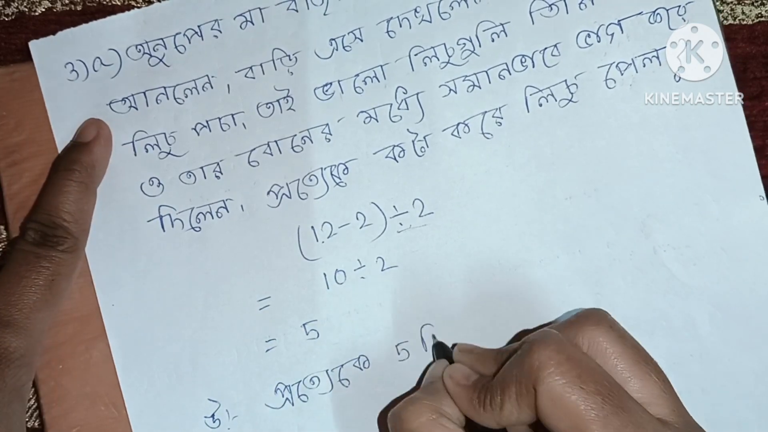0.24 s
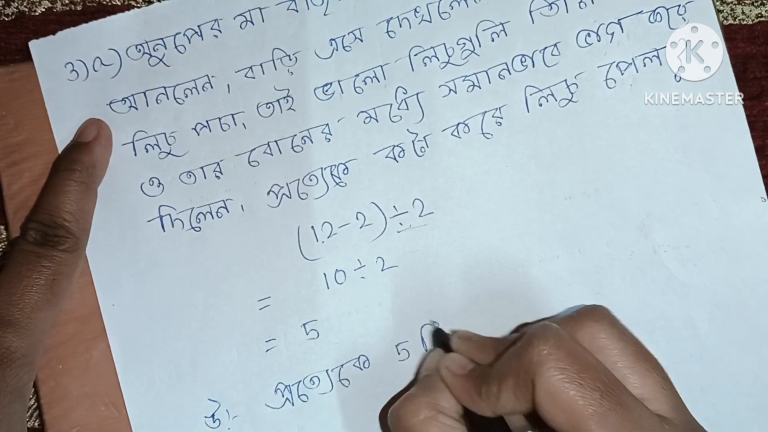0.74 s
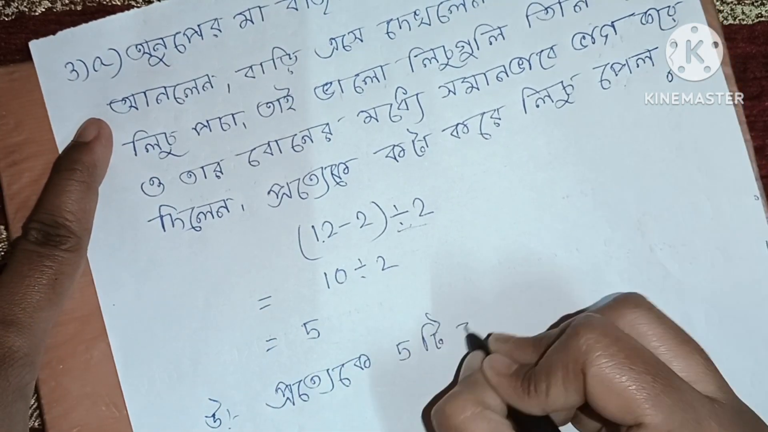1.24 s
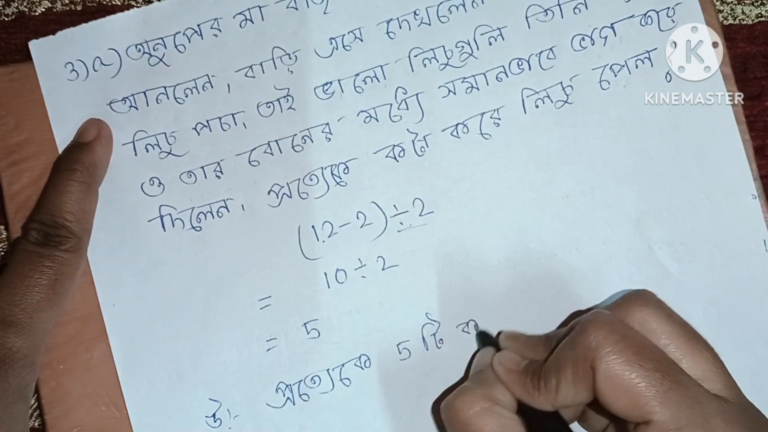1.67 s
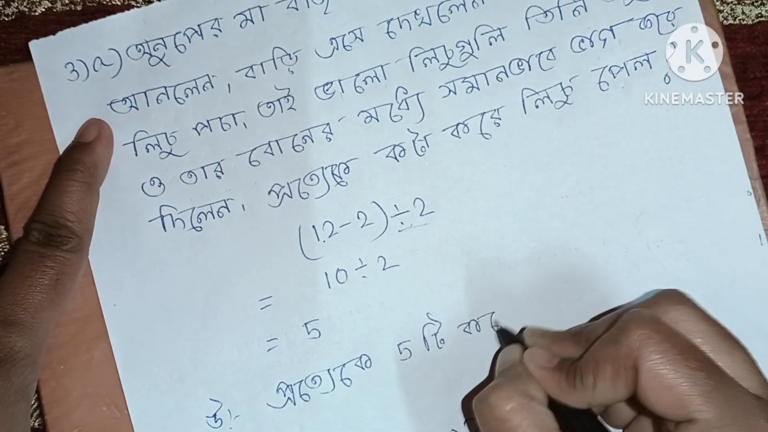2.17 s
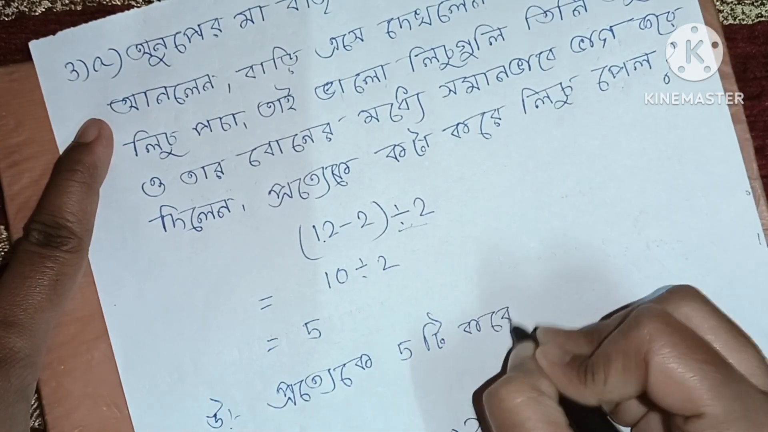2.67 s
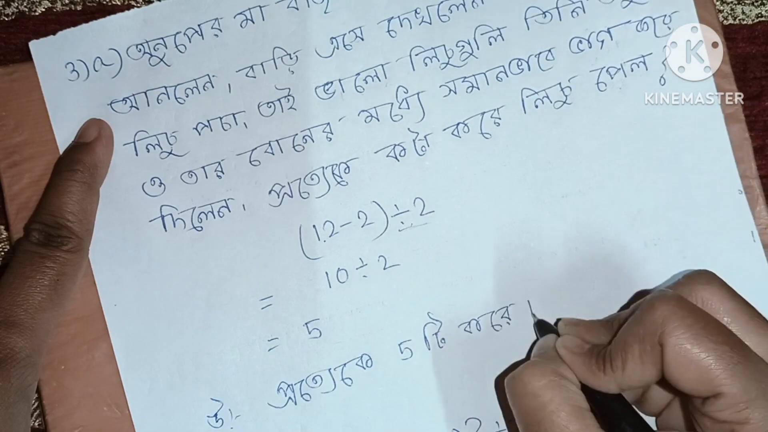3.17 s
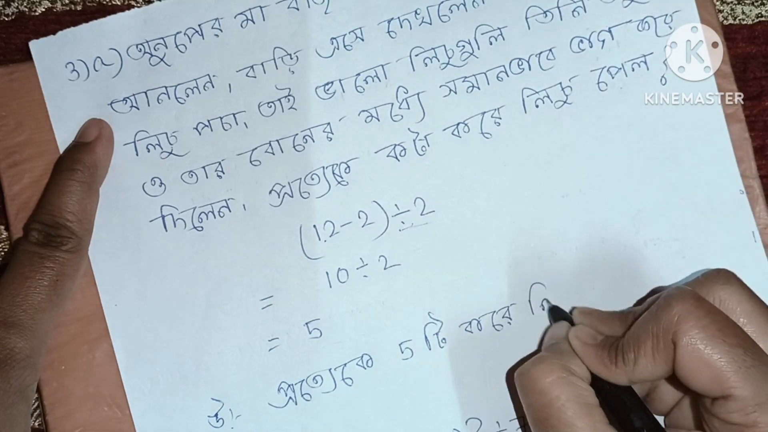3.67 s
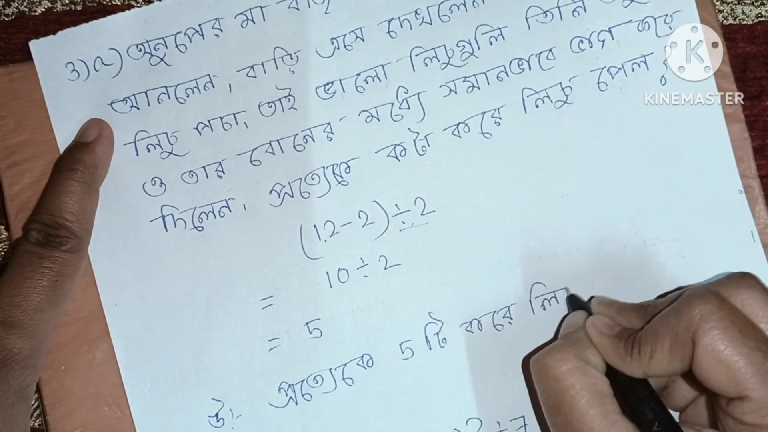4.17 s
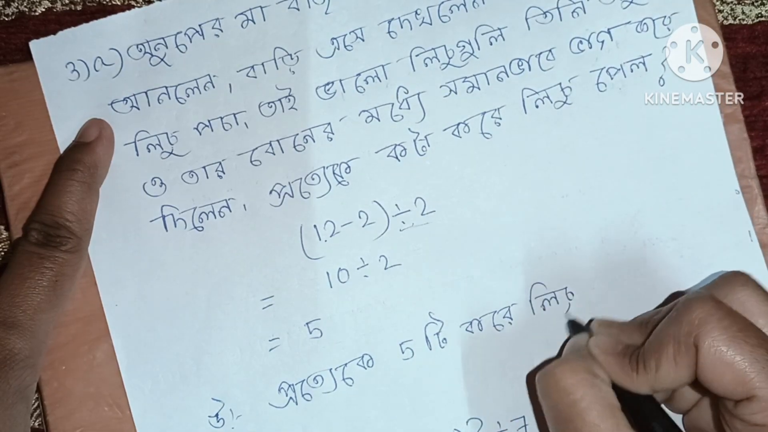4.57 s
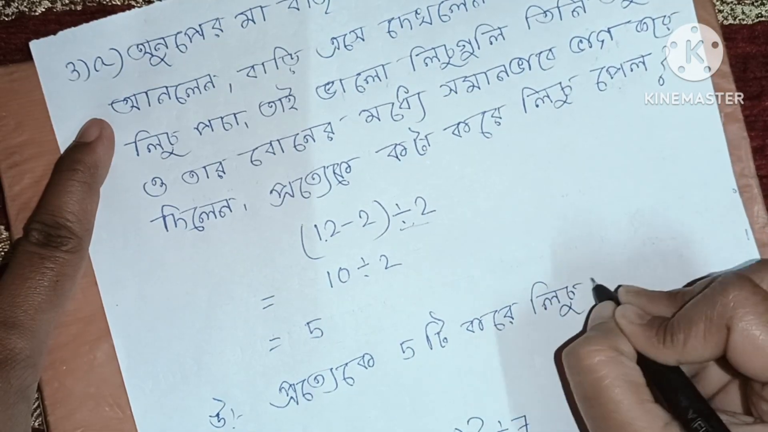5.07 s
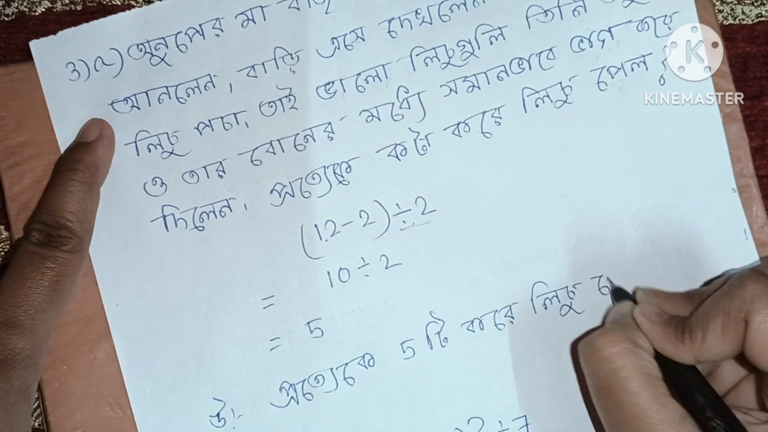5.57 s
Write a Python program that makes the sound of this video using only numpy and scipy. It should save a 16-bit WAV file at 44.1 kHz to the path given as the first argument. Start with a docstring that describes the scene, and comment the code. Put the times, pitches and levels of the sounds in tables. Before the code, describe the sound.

Close to a small microphone in a quiet room, a ballpoint writes on a sheet lying on a wooden table. Faint scratchy strokes and paper rustle come in uneven bursts over a low steady hush. The table knocks dully as tip or hand lands. The plastic pen snaps at just over one second and loudest at two, then lighter strokes, ticks and taps continue almost to the end.

```python
"""Someone writes with a ballpoint on a sheet on a wooden table in a quiet room, close to a small microphone.
Over a steady hush, short strokes scratch (ball on fibres) and rustle (sheet under the hand) from the start.
The table rumbles along and knocks when tip or hand lands; the plastic pen ticks, and snaps at about 1.2 to 1.3 s.
A faint sagging tone runs from 1.45 to 2.03 s, then come the loudest snaps; strokes, ticks and knocks go on
almost to the end. Ticks and knocks are struck modes, and the room answers them with a short echo tail."""
import sys
import numpy as np
from scipy import signal
from scipy.fft import rfft, irfft
from scipy.io import wavfile

SR = 44100
rng = np.random.default_rng(int(sys.argv[2]) if len(sys.argv) > 2 else 0)


def master(y):
    """Save y as 16-bit WAV."""
    cut = np.clip(np.atleast_2d(y).T, -1, 1)
    pcm = np.round(cut * 32767)  # scale
    wavfile.write(sys.argv[1], SR, pcm.astype(np.int16))


N = 257103   # length in samples

# Pen strokes: middle_s, length_s (between half-power points), scratch_db, rustle_db
PEN_STROKES = [(0.0, 0.062, -65, -61), (0.07, 0.023, -65, -62), (0.16, 0.046, -72, -64),
               (0.264, 0.074, -70.5, -70), (0.433, 0.028, -68.5, -63.5), (0.919, 0.055, -76, -68.5),
               (1.065, 0.034, -65, -63.5), (1.211, 0.075, -46.5, -50.5), (1.325, 0.029, -57, -69),
               (1.415, 0.043, -62, -61.5), (1.498, 0.032, -72, -65), (1.612, 0.025, -67.5, -65),
               (1.716, 0.037, -65.5, -63), (1.899, 0.061, -65.5, -67.5), (2.015, 0.056, -57, -68),
               (2.102, 0.031, -56, -60.5), (2.19, 0.017, -56, -55), (2.265, 0.032, -66, -54),
               (2.445, 0.034, -56, -53.5), (2.512, 0.07, -67, -59), (2.629, 0.031, -80.5, -74.5),
               (3.037, 0.052, -75, -71), (3.126, 0.03, -63, -65), (3.192, 0.069, -51, -49.5),
               (3.309, 0.04, -57, -55), (3.424, 0.037, -56, -56), (3.49, 0.044, -58.5, -53.5),
               (3.558, 0.032, -63, -56), (3.66, 0.018, -82, -67), (3.742, 0.052, -86, -66.5),
               (4.028, 0.026, -72.5, -68.5), (4.17, 0.039, -71.5, -71.5), (4.313, 0.042, -54, -56),
               (4.434, 0.047, -63.5, -57.5), (4.582, 0.018, -65.5, -59), (4.735, 0.043, -73.5, -70),
               (4.942, 0.063, -68, -80), (5.019, 0.031, -59, -63), (5.09, 0.11, -68, -64),
               (5.168, 0.051, -55.5, -59), (5.298, 0.017, -64, -67), (5.393, 0.023, -60.5, -52.5),
               (5.618, 0.079, -71.5, -76.5), (5.747, 0.024, -75, -62.5)]
# Weight of the hand dragging on the sheet, given as the rustle it makes: time_s, rustle_db
HAND_WEIGHT = [(0.0, -69.5), (0.37, -73.5), (0.97, -75), (1.14, -66), (1.2, -65), (1.33, -54),
               (1.51, -65.5), (1.8, -70), (2.0, -63), (2.06, -45), (2.16, -53.5), (2.4, -59.5), (2.63, -69),
               (2.9, -74.5), (3.12, -70), (3.18, -54.5), (3.4, -60), (3.85, -69), (4.2, -78.5),
               (4.27, -62.5), (4.77, -66), (4.92, -65), (5.39, -62.5), (5.83, -74.5)]
# Ringing modes of the table top: pitch_hz, relative level_db, t60_s (time to fade by 60 dB)
TABLE_MODES = [(112, -17.5, 0.022), (174, -1.5, 0.015), (256.4, -3.5, 0.033), (314.3, -10.5, 0.035),
               (439.2, -10, 0.029), (550.4, -0.5, 0.02), (664, 2, 0.014), (772.4, -15, 0.032)]
UPPER_FROM_HZ = 400   # the table's upper modes begin here


def amp(db):
    """Decibels to gain."""
    return 10 ** (np.asarray(db) / 20)


def rms_one(x):
    """Scale to unit rms, an average strength of 1."""
    return x / np.sqrt(np.mean(x ** 2) + 1e-20)


def in_time(rows):
    """Turn a table of points in time into curves with one value a sample."""
    time_s, *columns = np.transpose(rows)
    return [np.interp(np.arange(N) / SR, time_s, column) for column in columns]


def drift(rate_hz):
    """Slow random wandering with unit spread, moving about rate_hz times a second."""
    step = 40   # samples between the computed points
    r = np.exp(-2 * np.pi * rate_hz * step / SR)
    noise = rng.standard_normal(N // step + 2002)
    slow = signal.lfilter([1], [1, -2 * r, r * r], noise)[2000:]   # skip the settling of the filter
    return np.interp(np.arange(N) / step, np.arange(len(slow)), rms_one(slow))


def ring(clicks, hz, t60_s):
    """A resonance: a unit click sets off a fading sine that starts at height 1."""
    r = amp(-60 / (t60_s * SR))
    w = 2 * np.pi * hz / SR
    return signal.lfilter([0, np.sin(w)], [1, -2 * r * np.cos(w), r * r], clicks + 1e-18)


def coloured(x, spectrum):
    """Give a white signal the shape of a spectrum, at unit rms."""
    hz, level_db = np.transpose(spectrum)
    grid_hz = np.maximum(np.fft.rfftfreq(N, 1 / SR), 1)
    shape_db = np.interp(np.log(grid_hz), np.log(hz), level_db)
    edge_db = -30 * np.maximum(np.log2(hz[0] / grid_hz), 0)   # falls away under the first point
    return rms_one(irfft(rfft(x) * amp(shape_db + edge_db), N))


def grains(per_s, spread_db):
    """Random tiny clicks with uneven sizes and signs, like fibres giving way."""
    sizes = amp(spread_db * np.minimum(rng.exponential(1, N), 5))
    signs = rng.choice([-1, 1], N)
    return sizes * signs * (rng.random(N) < per_s / SR)


def struck(times_s, modes, group_db, build_cycles):
    """Every blow strikes each mode with its group's strength, give or take; a mode builds up over some cycles."""
    at = np.round(times_s * SR).astype(int)
    luck = rng.standard_normal((len(times_s), len(modes)))
    total = 0
    for k, (hz, level_db, t60_s) in enumerate(modes):
        clicks = np.zeros(N)
        clicks[at] = amp(group_db(hz) + level_db + 2 * luck[:, k])
        push_s = build_cycles / hz
        push = ring(clicks, hz, push_s)   # a short ringing drives the mode proper
        even_out = 3 * np.log(1000) / (push_s * SR)   # offsets the gain of ringing twice
        total = total + ring(push, hz, t60_s) * even_out
    return total


def soft(x, hz):
    """Dull a sound like a contact that lasts a while: double one-pole low-pass."""
    r = np.exp(-2 * np.pi * hz / SR)
    return signal.lfilter([(1 - r) ** 2], [1, -2 * r, r * r], x)


def above(x, hz):
    """High-pass: a small top radiates little below its lowest mode."""
    return signal.sosfilt(signal.butter(2, hz, "high", fs=SR, output="sos"), x)


def with_swells(steady_db, swells):
    """Gains of two layers: slow levels plus short swells, added in power, that set in and stop fairly abruptly."""
    t = np.arange(N) / SR
    powers = amp(2 * np.array(steady_db))   # doubled decibels turn gain into power
    for middle_s, length_s, *levels_db in swells:
        first = max(int((middle_s - 2 * length_s) * SR), 0)
        near = slice(first, int((middle_s + 2 * length_s) * SR))
        place = 2 * (t[near] - middle_s) / length_s   # -1 and 1 are the half-power points
        edge = np.where(place < 0, 3.5, 2.5)   # the rise is steeper than the fall
        shape = 2 ** -np.abs(place) ** edge
        powers[:, near] += np.outer(amp(2 * np.array(levels_db)), shape)
    return np.sqrt(powers)


def with_hand(usual_db, share):
    """A level in dB that follows a share of the swing in the weight of the hand."""
    usual_weight_db = -65
    return usual_db + share * (in_time(HAND_WEIGHT)[0] - usual_weight_db)


def quiet_hush():
    """Steady noise with a fixed spectrum, its level wandering slowly."""
    # Colour of the background noise: pitch_hz, relative level_db per Hz
    hush_spectrum = [(18, -71), (30, -14.5), (43, 5.5), (173, 6.5), (399, -15), (518, -6), (1020, -11),
                     (2760, -17), (6050, -39), (8060, -43), (9680, -38), (11300, -42), (15500, -43.5)]
    level_db = -63.5 + 2.4 * drift(1.4)
    return amp(level_db) * coloured(rng.standard_normal(N), hush_spectrum)


def husky_tone():
    """A faint sagging tone, about half a second long, wavering in pitch and level."""
    # Path of the tone before its wavering: time_s, pitch_hz, level_db (peak height)
    tone_path = [(1.45, 628, -85), (1.52, 625, -66), (1.7, 615, -65), (1.95, 600, -64), (2.03, 598, -72)]
    pitch_hz, level_db = in_time(tone_path)
    t = np.arange(N) / SR
    tone = np.sin(2 * np.pi * np.cumsum(pitch_hz + 8 * drift(12)) / SR)
    sounding = (t > tone_path[0][0]) * (t < tone_path[-1][0])
    return sounding * amp(level_db + 3.5 * drift(14)) * tone


def room(x):
    """Dense echoes that die away at random, treble first."""
    t60_s, wall_cut_hz = 0.31, 2200
    t = np.arange(int(.8 * SR)) / SR
    white = rng.standard_normal(len(t))
    dull = soft(white, wall_cut_hz)
    bright = white - dull
    tail = dull * amp(-60 * t / t60_s) + bright * amp(-60 * t / (.4 * t60_s))
    tail *= np.clip((t - .004) / .008, 0, 1)   # first walls answer after a few ms
    return signal.fftconvolve(x, tail / np.sqrt(np.sum(tail ** 2)))[:N]


def rumble():
    """Dense small shoves from strokes, scuffs and the dragging hand keep the table's modes sounding."""
    # Scuffs that shake the table harder: middle_s, length_s (half power), low_modes_db, upper_modes_db
    scuffs = [(0.064, 0.036, -73, -55), (0.176, 0.035, -44.5, -62), (0.249, 0.016, -73, -59.5),
              (0.436, 0.046, -73, -59.5), (1.354, 0.068, -49.5, -59), (1.5, 0.067, -59, -55.5),
              (1.62, 0.04, -56, -63), (1.706, 0.038, -62, -56.5), (2.073, 0.095, -57, -46),
              (2.176, 0.028, -51, -44.5), (2.632, 0.023, -61, -62), (3.302, 0.034, -72, -46),
              (3.419, 0.052, -42, -46), (3.68, 0.044, -53.5, -63), (3.762, 0.022, -55.5, -72),
              (4.161, 0.042, -61, -73), (4.305, 0.067, -55.5, -52), (4.43, 0.057, -66, -54.5),
              (4.893, 0.059, -54, -58), (5.653, 0.016, -61, -69)]
    stroke_shakes_db = (-10, -4.5)   # low and upper modes, relative to the stroke's rustle
    shakes = [(middle_s, length_s, *np.add(rustle_db, stroke_shakes_db))
              for middle_s, length_s, _, rustle_db in PEN_STROKES]
    steady_db = [with_hand(usual_db=-63.5, share=0.8), with_hand(usual_db=-64.5, share=0.47)]
    low_gain, upper_gain = with_swells(steady_db, list(scuffs) + shakes)
    shoves = grains(700, spread_db=-0.5) * amp(1.1 * drift(24))
    low = upper = 0
    for hz, level_db, t60_s in TABLE_MODES:
        mode = amp(level_db) * ring(shoves, hz, t60_s)
        if hz < UPPER_FROM_HZ:
            low = low + mode
        else:
            upper = upper + mode
    return low_gain * rms_one(above(low, 88)) + upper_gain * rms_one(upper)


def knocks():
    """Tip or hand lands on the table: dull blows into its modes, all starting together."""
    # Landings, levels relative: time_s, low_modes_db, upper_modes_db
    landings = [(0.336, -41, -39), (0.552, -36.5, -53), (0.754, -48, -42), (0.815, -46, -52.5),
                (0.919, -38.5, -31.5), (0.937, -43.5, -39), (1.065, -36, -36.5), (1.175, -27.5, -31),
                (1.238, -19.5, -30), (1.325, -59, -25.5), (2.027, -34, -29), (2.041, -51, -16.5),
                (2.146, -36, -30.5), (2.163, -29, -30.5), (2.177, -39, -43), (2.358, -64, -43),
                (2.373, -30.5, -39), (2.518, -52.5, -41), (2.748, -40, -62), (2.85, -45, -43.5),
                (3.06, -40, -43.5), (3.154, -54, -32.5), (3.205, -25, -29.5), (3.308, -57, -27.5),
                (3.402, -36, -34), (3.426, -39, -17), (3.488, -33, -29), (3.568, -29, -38),
                (4.029, -41, -38), (4.234, -37.5, -45.5), (4.246, -56, -44), (4.306, -34, -45),
                (4.53, -47, -42.5), (4.58, -35.5, -41), (4.655, -33.5, -44), (4.813, -39.5, -47.5),
                (4.867, -31.5, -40), (4.881, -35.5, -43), (4.894, -37, -38.5), (4.988, -33.5, -61),
                (5.031, -34, -36.5), (5.197, -31, -32.5), (5.293, -43, -40), (5.387, -35.5, -48),
                (5.453, -53, -45), (5.583, -80, -45.5), (5.643, -45.5, -50.5)]
    time_s, low_db, upper_db = np.transpose(landings)
    contact_s = time_s - 0.00096   # contact begins this long before the knock is heard
    low_modes = [m for m in TABLE_MODES if m[0] < UPPER_FROM_HZ]
    upper_modes = [m for m in TABLE_MODES if m[0] > UPPER_FROM_HZ]
    low = struck(contact_s, low_modes, lambda hz: low_db, build_cycles=3.0)
    upper = struck(contact_s, upper_modes, lambda hz: upper_db, build_cycles=5.7)
    return amp(-4.0) * (above(low, 110) + above(soft(upper, 1500), 350))


def pen_ticks():
    """The plastic pen ticks and snaps: very short modes, barrel under 4 kHz and small parts above."""
    # Ticks and snaps, levels relative: time_s, low_db, middle_db, main_db, top_db (groups of modes)
    tick_list = [(0.334, -76, -70, -52.5, -65), (1.16, -74, -63, -40, -63), (1.1765, -32, -29.5, -29, -48),
                 (1.3245, -37.5, -20.5, -11, -52), (2.017, -49, -43, -39, -56),
                 (2.034, -25.5, -20, -2, -39), (2.0394, -13, -32, -9, -36), (2.0414, -18.5, -21, -8, -31.5),
                 (2.1776, -32, -35, -41, -49), (2.3542, -42, -28.5, -25.5, -69),
                 (2.4794, -51.5, -56, -45, -46.5), (2.9099, -45, -41, -32, -78),
                 (3.0574, -53, -65, -51, -61), (3.1557, -29.5, -43.5, -29, -55),
                 (3.1704, -51, -40, -21, -36.5), (3.3073, -47, -45, -42, -63),
                 (3.4886, -29.5, -42, -31, -61), (3.5223, -43, -49, -39, -58),
                 (4.2459, -35.5, -39, -36, -83), (4.4478, -47.5, -70, -63, -51),
                 (4.5313, -39, -46, -41, -76), (4.5694, -39, -53, -33.5, -73), (4.6012, -43, -54, -58, -62),
                 (4.866, -40.5, -57, -52, -54.5), (5.2335, -46.5, -44.5, -63, -58.5),
                 (5.295, -44, -47, -48, -78), (5.3852, -32, -34.5, -34.5, -54)]
    # Ringing modes of the pen: pitch_hz, relative level_db, t60_s (time to fade by 60 dB)
    plastic_modes = [(1010, 0, 0.011), (1350, 2.5, 0.0058), (1882, -3.5, 0.014), (2033, 0, 0.014),
                     (2557, -3, 0.0086), (2793, -3.5, 0.0095), (3150, -6.5, 0.0073), (4890, 7.5, 0.0055),
                     (5445, 6, 0.0041), (9070, 12, 0.003), (13100, 8.5, .002)]
    small_from_hz = 4000
    time_s, low_db, middle_db, main_db, top_db = np.transpose(tick_list)
    high_db = top_db + 0.54 * (main_db - top_db) - 9   # high modes follow both main and top
    groups_db = low_db, middle_db, main_db, high_db, top_db

    def group_db(hz):
        """Strengths of all ticks in the group of modes that holds this pitch."""
        return groups_db[np.searchsorted([1550, 2200, 4000, 7000], hz)]

    barrel_modes = [m for m in plastic_modes if m[0] < small_from_hz]
    small_modes = [m for m in plastic_modes if m[0] > small_from_hz]
    barrel = struck(time_s, barrel_modes, group_db, build_cycles=8.1)
    small = struck(time_s, small_modes, group_db, build_cycles=5.0)
    barrel = above(soft(barrel, 5000), 640)
    barrel = signal.sosfilt(signal.butter(4, 3900, fs=SR, output="sos"), barrel)
    return barrel + soft(soft(small, 8200), 9000)


def writing():
    """Each stroke swells and fades as ball and hand drag over the fibres and rustle the sheet."""
    # Colour of the ball's scratch: pitch_hz, relative level_db per Hz
    scratch_spectrum = [(3500, 0.5), (5000, -9), (6200, -14), (8000, -9), (9700, 2.5), (11300, -10),
                        (13000, -13), (15500, -13.5)]
    # Colour of the sheet's rustle: pitch_hz, relative level_db per Hz
    rustle_spectrum = [(700, -19.5), (1100, 0.5), (1500, -1.5), (2100, -0.5), (2500, -0.5), (2780, 1.5),
                       (3100, -2), (3700, -9), (4700, -12.5), (6000, -22.5)]
    steady_db = [with_hand(usual_db=-74.5, share=0.83), *in_time(HAND_WEIGHT)]
    scratch_gain, rustle_gain = with_swells(steady_db, PEN_STROKES)
    catching = drift(40)   # the ball catches and lets go, heard in both layers
    scratch_flicker = amp(1.2 * catching + 1.5 * drift(11))
    scratch = scratch_gain * scratch_flicker * coloured(grains(7800, spread_db=1.5), scratch_spectrum)
    rustle_flicker = amp(1.2 * catching + 1.5 * drift(32))
    rustle = rustle_gain * rustle_flicker * coloured(grains(4000, spread_db=0.5), rustle_spectrum)
    return scratch + rustle


def scene():
    """Add up hush, tone, table, pen and writing; the room answers ticks and knocks."""
    blows = pen_ticks() + knocks()
    echoes = amp(-16) * room(blows)
    background = quiet_hush() + husky_tone()
    return (background + echoes + rumble() + blows + writing())[None]


def record(dry):
    """The small microphone loses the deep bass; peaks are rounded and the top is cut steeply."""
    thin = signal.sosfilt(signal.butter(3, 60.3, "high", fs=SR, output="sos"), dry)
    ceiling = 0.9   # peaks bend towards this height
    rounded = ceiling * np.tanh(thin / ceiling)
    return signal.sosfilt(signal.ellip(12, .5, 90, 15550, fs=SR, output="sos"), rounded)


dry = scene()
out = record(dry)
master(out)
```